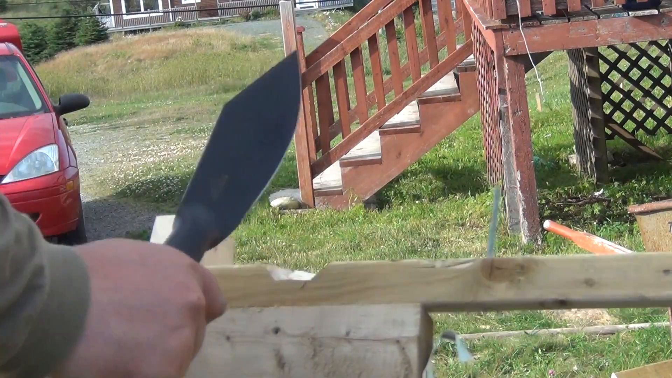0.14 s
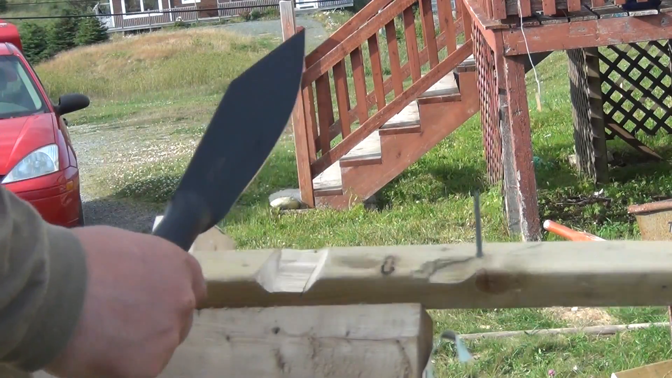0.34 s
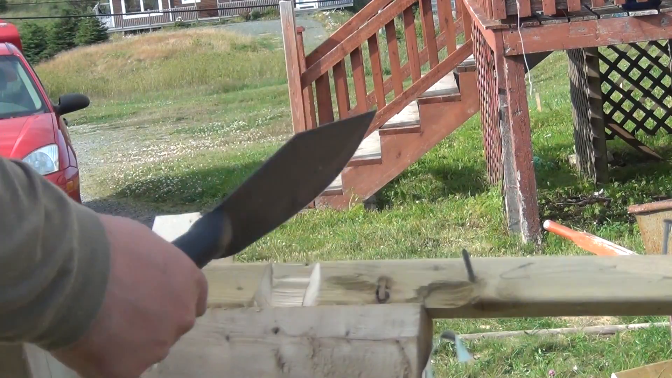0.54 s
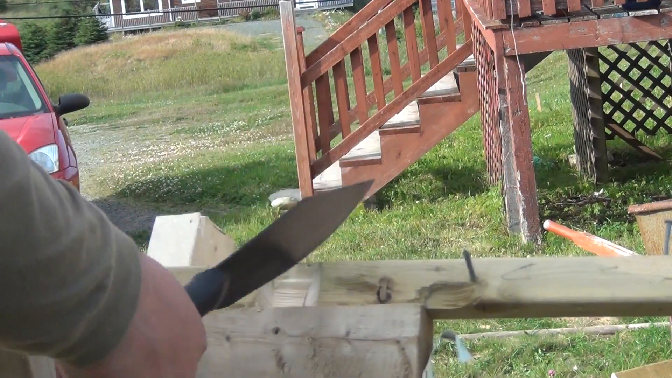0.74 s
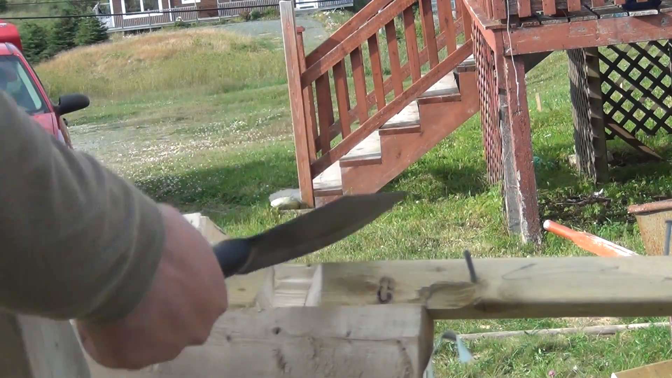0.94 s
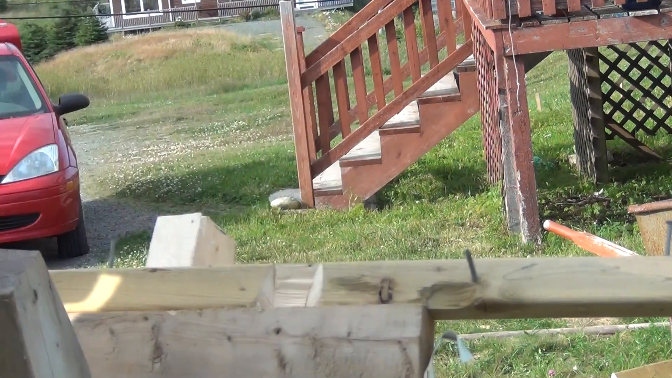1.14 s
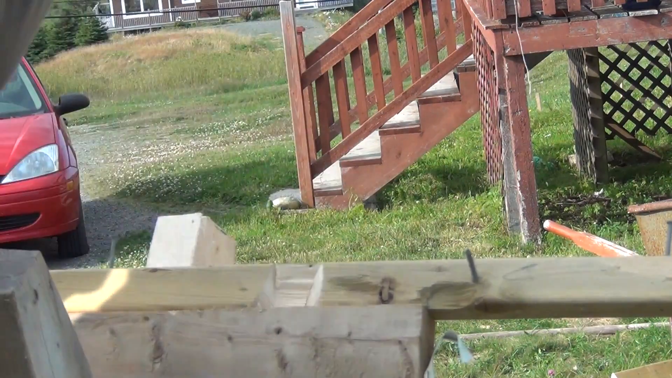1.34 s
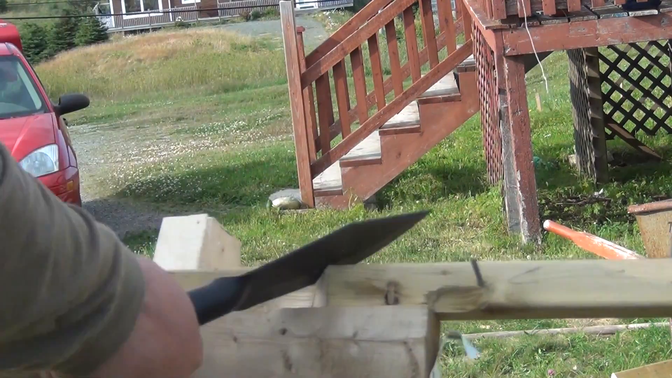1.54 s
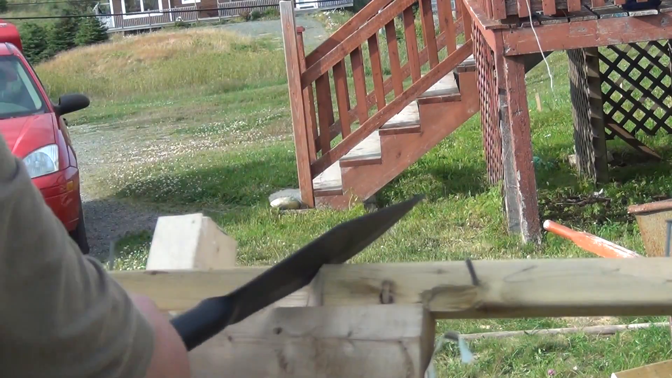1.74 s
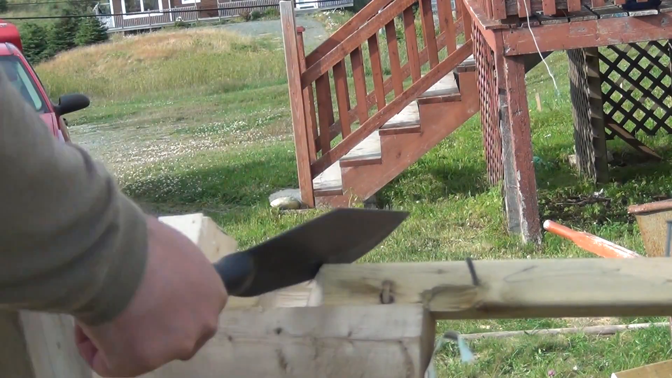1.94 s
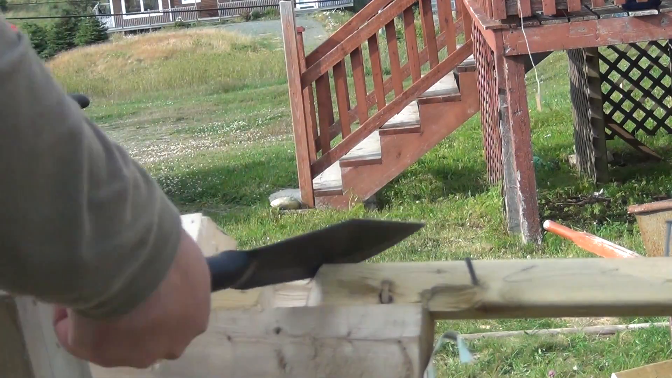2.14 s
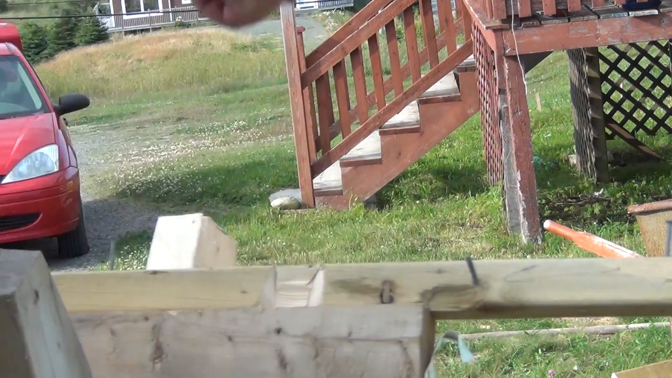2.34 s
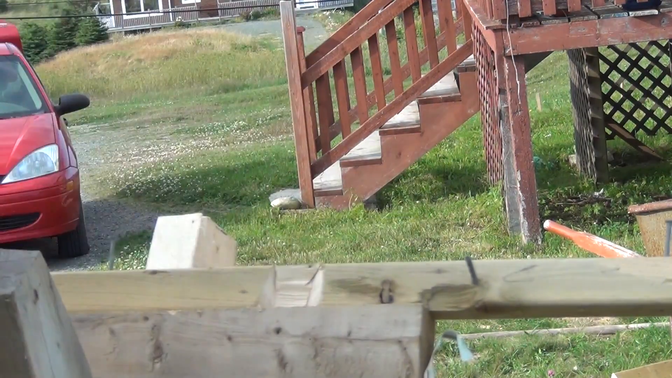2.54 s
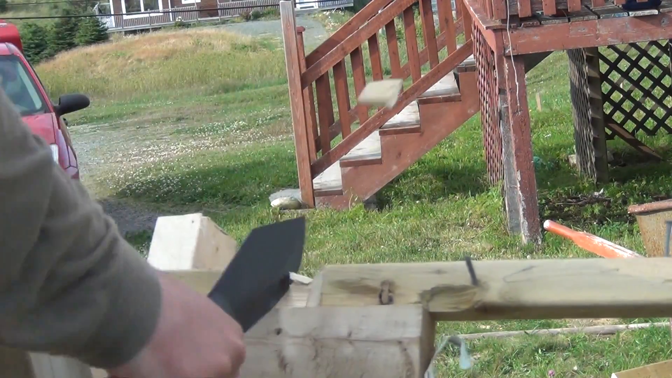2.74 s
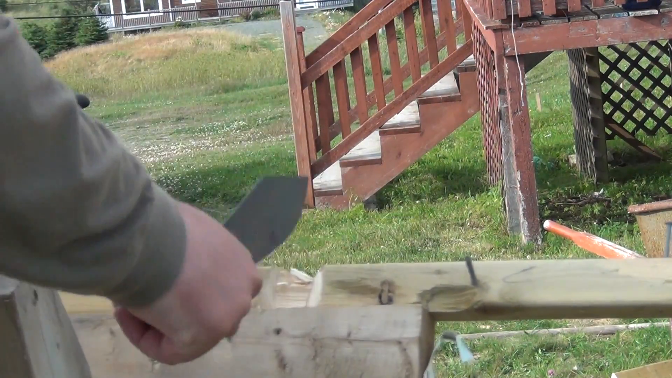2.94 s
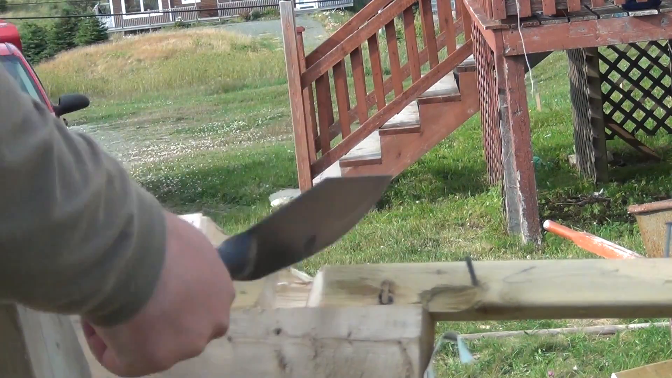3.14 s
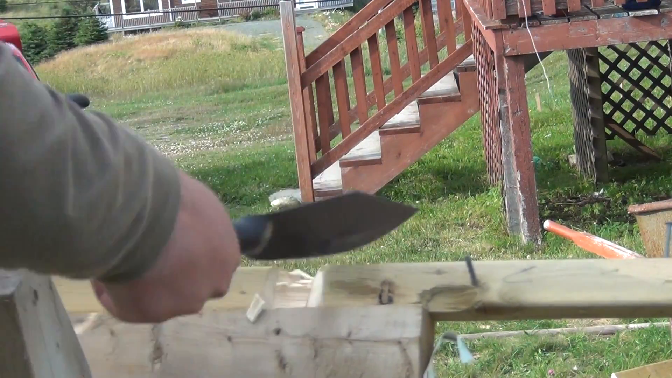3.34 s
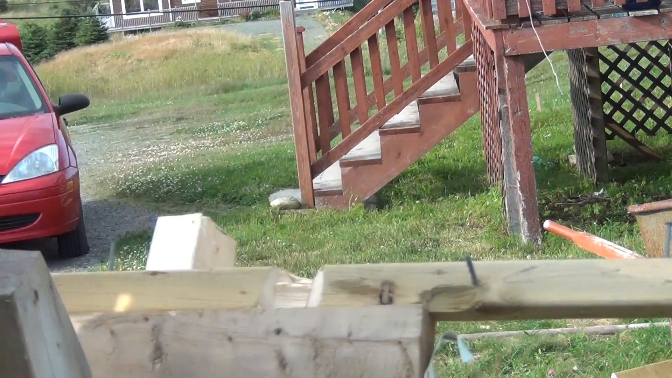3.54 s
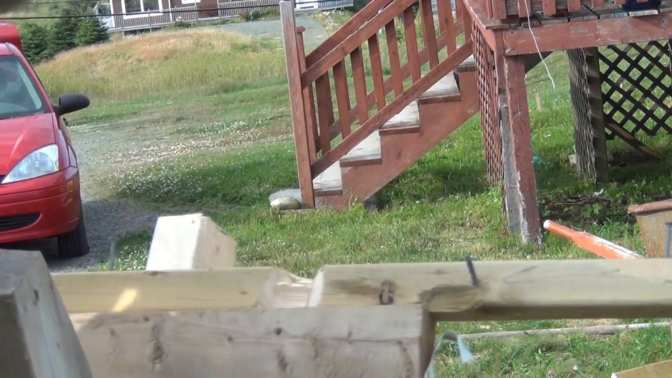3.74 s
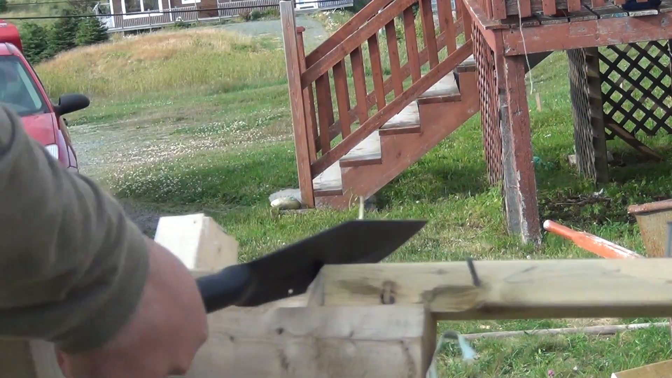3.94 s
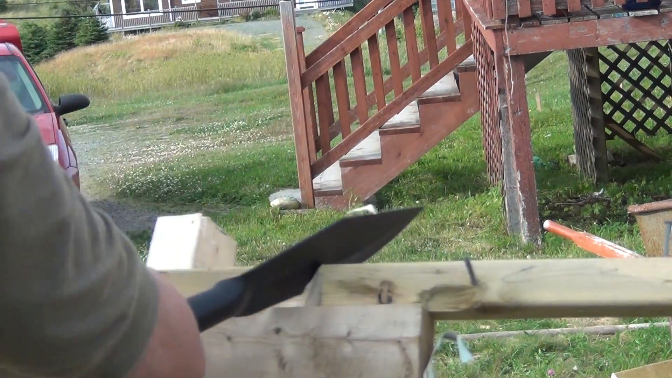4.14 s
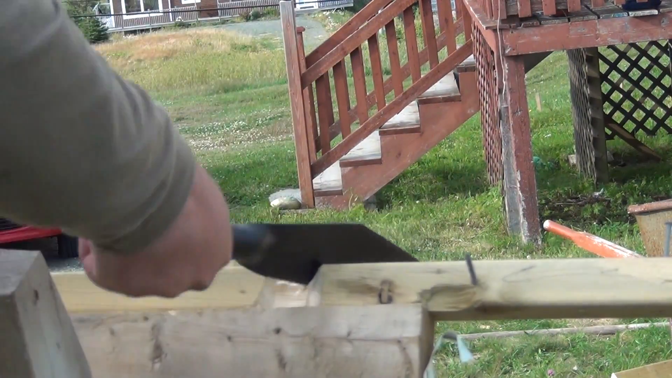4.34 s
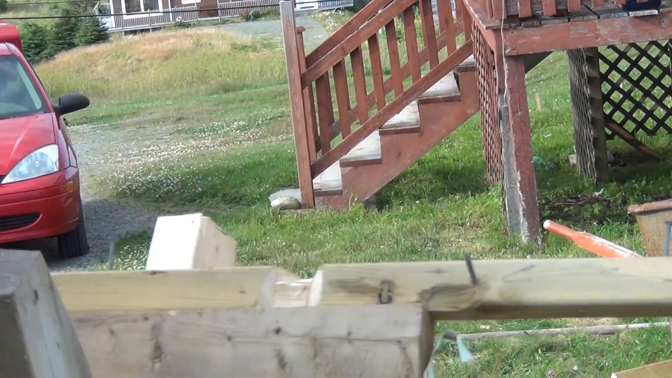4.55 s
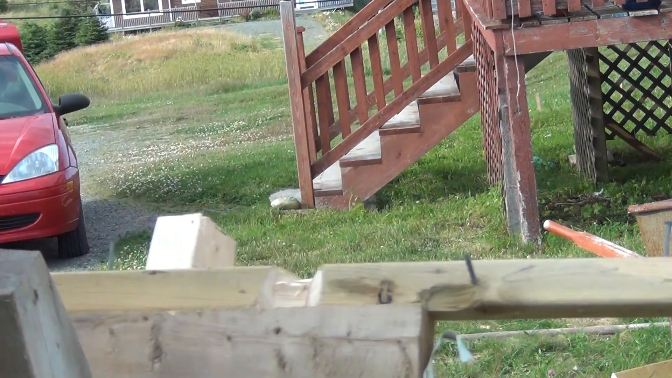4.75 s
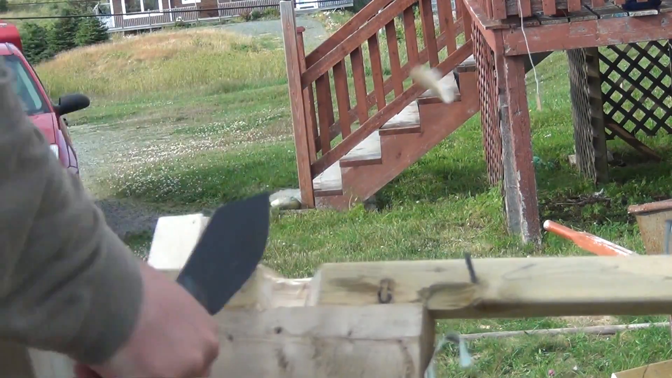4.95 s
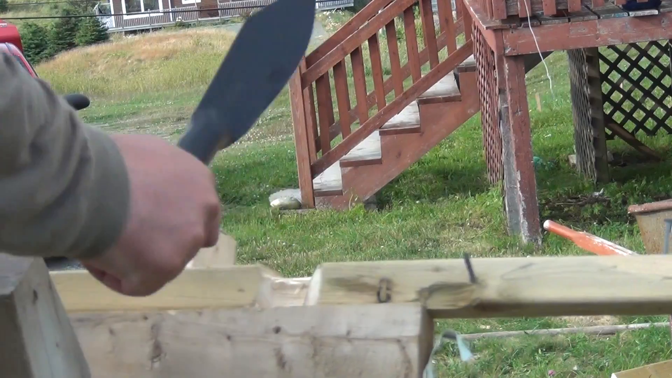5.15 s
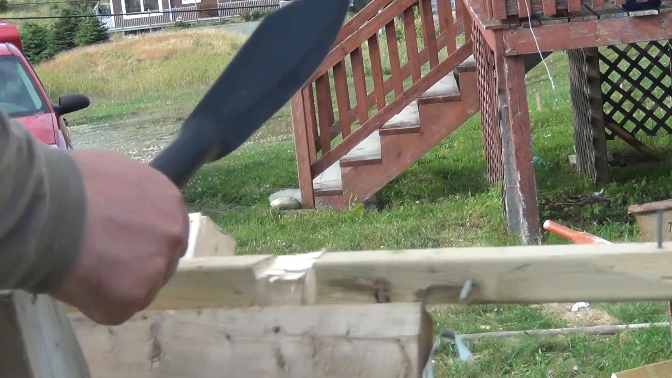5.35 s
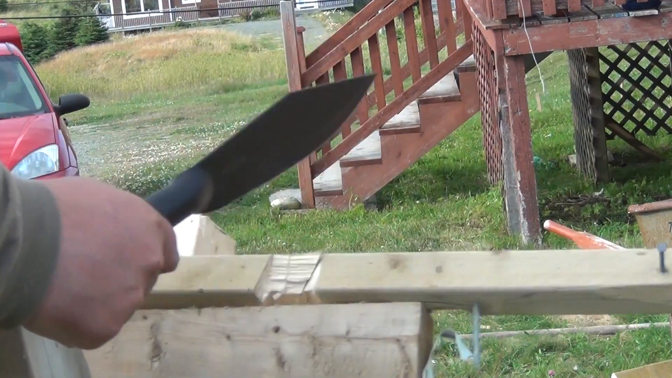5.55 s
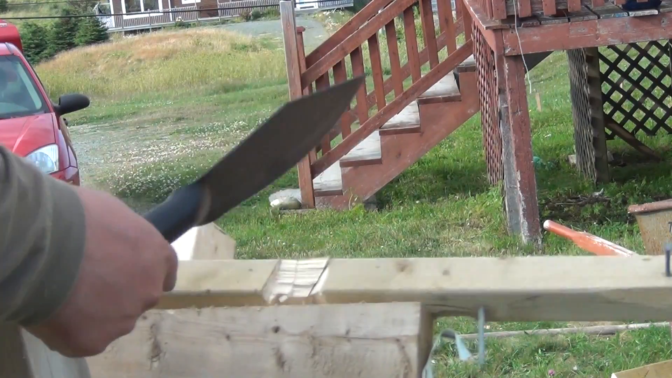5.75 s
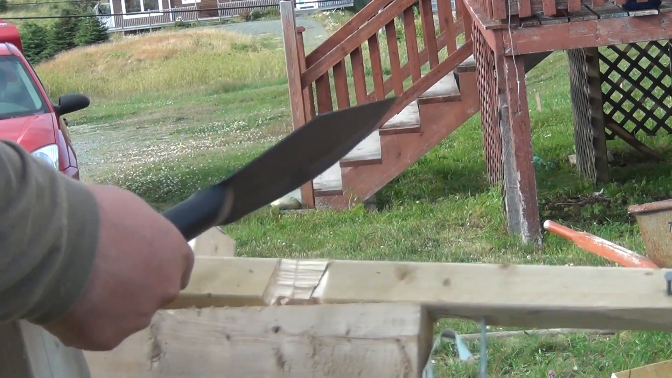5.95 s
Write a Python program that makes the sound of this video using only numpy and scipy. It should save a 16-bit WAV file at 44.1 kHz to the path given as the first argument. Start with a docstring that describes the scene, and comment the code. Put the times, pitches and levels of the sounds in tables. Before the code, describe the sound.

A large knife cuts a notch in a beam in an open yard. Quiet handling taps and a modest knock come first, then four loud, dry chops with woody thuds, bounces, splintering and metallic ring. Small scrapes and clicks follow as the edge is levered out. Wind rumbles in lumps against the close microphone, with a soft far road hum and short dull echoes. It ends on light rubs.

```python
"""Chopping a notch outdoors

A heavy knife chops into a loose beam on a timber stand: cracks and thuds are short noise, the booming,
bouncing beam and the ringing steel are sums of fading tones. Between chops the blade is levered out,
with tears, scrapes and ticks of shaped noise. Wind buffets the microphone over a far road hum, with a
faint whine and dull echoes; the recorder's limiter flattens the chops."""
import sys
import numpy as np
from scipy import signal
from scipy.fft import rfft, irfft, next_fast_len
from scipy.io import wavfile

SR = 44100
rng = np.random.default_rng(int(sys.argv[2]) if len(sys.argv) > 2 else 0)


def put_to_file(sound):
    """Save the sound as 16-bit audio at rate SR, in the file named by the first command-line argument."""
    columns = np.atleast_2d(sound).T  # one column per channel
    safe = np.clip(columns, -1, 1)
    whole_steps = np.round(safe * 32767)
    wavfile.write(sys.argv[1], SR, whole_steps.astype(np.int16))


N = 265041


def amp(db):
    """Turns dB into a gain."""
    return 10 ** (np.asarray(db) / 20)


def unit(x):
    """Scales a sound to an rms of 1."""
    return x / np.sqrt(np.mean(x ** 2) + 1e-20)


def in_time(rows, outside=None):
    """Reads the columns of a time curve at every sample."""
    s, *columns = np.transpose(rows)
    return [np.interp(np.arange(N) / SR, s, c, left=outside, right=outside) for c in columns]


def at_hz(points, hz):
    """Reads a curve over pitch, with straight lines on a log-frequency axis."""
    point_hz, values = np.array(points).T
    return np.interp(np.log(hz), np.log(point_hz), values)


def band(x, low_hz, high_hz):
    """Keeps mainly the sound between two frequencies."""
    edges = [low_hz, min(high_hz, .48 * SR)]
    return signal.sosfilt(signal.butter(2, edges, "band", fs=SR, output="sos"), x)


def drift(rate_hz):
    """A smooth random wander around zero with a spread of 1, made at one point per 40 samples."""
    r = np.exp(-80 * np.pi * rate_hz / SR)
    slow = signal.lfilter([1], [1, -2 * r, r * r], rng.standard_normal(N // 40 + 2002))[2000:]
    return np.interp(np.arange(N) / 40, np.arange(len(slow)), unit(slow))


def fading(s, t60, rise):
    """Start sample, time axis and envelope of a sound that rises and falls 60 dB over t60 seconds."""
    start = round(s * SR)
    t = np.arange(min(round(t60 * SR), N - start)) / SR
    return start, t, amp(-60 * t / t60) * (1 - np.exp(-t / rise))


def add(out, start, x):
    """Mixes x into out from a given sample."""
    out[..., start:start + x.shape[-1]] += x


def coloured(spectrum, likeness):
    """Stereo noise of rms 1 with a given spectrum and left-right likeness."""
    size = next_fast_len(N)
    hz = np.maximum(np.arange(size // 2 + 1) * SR / size, 1)
    mid, side = rfft(rng.standard_normal((2, size))) * amp(at_hz(spectrum, hz))
    alike = np.clip(at_hz(likeness, hz), 0, 1)
    both = np.sqrt(1 + alike) * mid + np.sqrt(1 - alike) * side * [[1], [-1]]
    return unit(irfft(both, size)[:, :N])


def knocks():
    """Each contact gives a bright crack, a dull thud that dies band by band, and the beam's modes."""
    # Chops, bounces and chips. Each row: start in seconds, relative crack level in dB, relative beam
    # level in dB, share of the free ring time, hardness (tilt of thud and beam) in dB per octave.
    contacts = [(0.0416, -19, -61.5, 1, -7.5), (0.171, -34, -39, 0.44, -2), (0.3427, -29, -39.5, 0.68, 5.5),
                (0.5057, -14, -20.5, 0.87, 0), (0.5204, -19, -27.5, 1.34, -4),
                (0.7993, -11, -34, 0.83, -5.5), (1.5429, 7, -5.5, 0.36, 0.3),
                (1.5553, -25, -5.5, 0.65, -1.5), (1.581, -5.5, -19, 1.2, 0.5), (1.6246, -7, -20, 0.62, 2),
                (1.6558, -17, -16, 0.21, 3.5), (1.7125, -19.5, -54, 0.56, 7),
                (2.0527, -4, -30.5, 0.28, 5.5), (2.3566, -8, -35.5, 0.86, -3), (2.8036, 2.5, -7.5, 1.1, 5),
                (2.8256, 1, -14, 1, -2), (2.8639, -6.5, -20, 1.04, 6), (2.8805, 1.5, -22.5, 0.69, 2),
                (2.9044, -8, -40, 0.66, 16.5), (2.9416, -17, -37.5, 1.34, 5.5),
                (3.2975, -29, -21.5, 0.24, -1), (3.3157, -9, -30.5, 0.52, -3), (3.325, -16, -43, 0.3, 3),
                (3.336, -9.5, -52, 0.54, -8), (3.9497, 5.5, -4.5, 0.78, 5), (3.97, -8, -1.5, 0.3, -0.5),
                (3.982, -7, -17, 0.61, -6), (4.0056, -6, -22.5, 1.3, -0.5), (4.0294, -8, -20.5, 0.94, 5),
                (4.059, 0, -14, 0.21, 0), (4.0826, -25, -33, 1, 5.5), (4.181, -16, -34.5, 0.58, 9.5),
                (4.5172, -6.5, -37, 0.29, 5), (5.0156, 1, -8, 1.15, 6.5), (5.034, -7, -8.5, 0.73, 1.5),
                (5.0482, 1, -7, 0.42, 6), (5.0751, -15, -29.5, 0.3, -12), (5.094, -1, -30.5, 1.03, -2.5),
                (5.1035, -25, -29, 0.46, 14), (5.115, -5, -31.5, 0.32, 14), (5.146, -34, -41, 0.26, 16.5),
                (5.475, -23, -42, 0.56, 7), (5.5957, -32, -33.5, 1.1, 5.5), (5.6216, -38, -24, 0.81, -3.5),
                (5.6407, -21, -28, 1.23, -1), (5.8086, -46, -40.5, 1, -6.5)]
    # Beam modes, then noise bands of crack and thud.
    # Each row: frequency in Hz, relative level in dB, free time to fall 60 dB in seconds.
    beam_modes = [(202.8, -6, 0.31), (332, -0.5, 0.29), (455.3, -6.5, 0.36), (630.5, 0.5, 0.25),
                  (701, -3.5, 0.33), (807, 2, 0.19), (964, -3, 0.26), (1067, 5, 0.2), (1177, 6, 0.14),
                  (1630, 0.5, 0.094), (1613, 4, 0.15), (2410, 2, 0.11)]
    crack_bands = [(2450, -5, 0.041), (4550, -9.5, 0.12), (5840, -7.5, 0.12), (9760, 1.5, 0.035)]
    thud_bands = [(177, -22.5, 0.39), (312, -5, 0.29), (453, -2.5, 0.18), (702, -4, 0.13),
                  (1152, -2.5, 0.14), (1840, -11, 0.071), (3280, -11, 0.06)]
    splinter_db, splinters_hz = 3, 58   # each band of a crack or thud comes in lumps
    soft_rise_s, rise_db_per_db = 0.00013, 0.2   # lighter contacts crush fibres and open more slowly

    out = np.zeros(N)
    noise = {}
    for hz, db, t60 in crack_bands + thud_bands:
        lumps = amp(splinter_db * drift(splinters_hz)[:SR])
        noise[hz] = unit(lumps * band(rng.standard_normal(SR), hz / 1.27, hz * 1.27))
    snap = unit(band(band(rng.standard_normal(SR), 3200, 14000), 1600, 12400))
    strength_db = rng.normal(0, 1.14, (len(contacts), len(beam_modes)))
    phase = rng.uniform(0, 2 * np.pi, strength_db.shape)
    detune = 1 + rng.normal(0, .012, strength_db.shape)   # the loose beam never rests the same way twice
    fresh = rng.integers(SR // 20, SR // 2, len(contacts))   # where each contact reads its noise

    for k, (s, crack_db, beam_db, damping, hardness_db) in enumerate(contacts):
        opening = min(soft_rise_s * amp(-rise_db_per_db * crack_db), .0006)
        start, t, envelope = fading(s, 0.00024 + 3.9 * opening, rise=0.26 * opening)   # the first snap
        add(out, start, amp(crack_db - 5.5) * envelope * snap[fresh[k]:fresh[k] + len(t)])
        damping = np.clip(damping, .1, 1.6)
        # thud and beam start quickly in light contacts and swell in more slowly in heavy ones
        swell_in = np.clip(amp(.6 * (beam_db + 10)), .3, 1)

        for hz, db, t60 in crack_bands:
            start, t, envelope = fading(s, min(t60 * damping, .3), rise=opening)
            gain = amp(crack_db + db - 22.5)
            add(out, start, gain * envelope * noise[hz][fresh[k]:fresh[k] + len(t)])
        for hz, db, t60 in thud_bands:   # the lower the band, the slower its start
            start, t, envelope = fading(s, min(t60 * damping, .3), rise=4.55 * swell_in / hz)
            gain = amp(beam_db + db - 4.5 + hardness_db * np.log2(hz / 1000))
            add(out, start, gain * envelope * noise[hz][fresh[k]:fresh[k] + len(t)])
        for j, (hz, db, t60) in enumerate(beam_modes):
            start, t, envelope = fading(s, t60 * damping, rise=3.6 * swell_in / hz)
            gain = amp(beam_db + db - 15.0 + hardness_db * np.log2(hz / 1000) + strength_db[k, j])
            tone = np.sin(2 * np.pi * hz * detune[k, j] * t + phase[k, j])
            add(out, start, gain * envelope * tone)
    return out


def blade():
    """Steel modes whose balance depends on where it is struck; in wood they swell as it comes free."""
    # Blows that ring the blade. Each row: start in seconds, relative ring level in dB, brightness (rise
    # from 3.8 to 9.5 kHz) in dB, two favoured modes in Hz and Hz, share of the free ring time
    # (held to 0.15-1.5), swell time in ms (at least 0.2).
    blows = [(.0414, -54.5, 11.5, 8952, 8450, 1.23, 0.56), (.8, -50.5, 27, 7273, 9030, 0.91, 0.27),
             (1.029, -65, 11, 8952, 10310, 0.59, 2), (1.542, -33, 35, 9400, 10430, 0.12, 0.46),
             (2.0527, -43, 38, 8952, 10310, 0.17, 0.21), (2.3584, -44, 12.5, 3085, 10310, 0.76, 3.7),
             (2.804, -29.5, 12, 8450, 9740, 0.75, 2.6), (2.815, -30, 8, 3205, 5640, 0.57, 10),
             (2.82, -40, -4, 3480, 3480, 0.81, 2), (3.0275, -56.5, 1, 8450, 10310, 0.51, 3.4),
             (3.2985, -44, 4.5, 10310, 8380, 0.82, 2), (3.3155, -46.5, 24, 8952, 8825, 0.48, 0.61),
             (3.3834, -56.5, 11, 6078, 8825, 0.46, .7), (3.433, -57, 19, 10310, 8780, 1, 2.7),
             (4.038, -41, -1, 8450, 8900, 0.19, .7), (4.519, -42, 19, 8450, 12300, 0.66, 2.6),
             (5.017, -26.5, 12, 5640, 4380, 0.44, 5.2), (5.02, -23, 22, 8952, 8825, 0.63, 34),
             (5.03, -53.5, -20.5, 3205, 3205, 1.1, 11), (5.05, -36, 3, 6078, 4380, 1, 4.2)]
    # Blade modes. Each row: frequency in Hz, relative level in dB, free time to fall 60 dB in seconds.
    blade_modes = [(2150, 0, 0.28), (3085, -2, 0.5), (3205, 1.5, 0.57), (3450, -2, 0.17), (4380, 0.5, 0.4),
                   (5640, -5.5, 0.29), (6078, -4.5, 0.34), (7160, -1, 0.1), (7150, -7.5, 0.31),
                   (8450, -2.5, 0.19), (8860, 0.5, 0.13), (8952, -10.5, 0.24), (9210, 6.5, 0.073),
                   (10330, 3, 0.082), (12300, -7, 0.12)]
    # Wood or hand touches the ringing blade. Each row: time in seconds, loss of the upper modes in dB,
    # loss of the lower modes in dB (a negative loss is a gain).
    touches = [(2.866, 15, -3), (2.966, 6, 11), (5.092, 13, -2), (5.135, 1, 5), (5.2, 5, 6)]
    upper_hz = 3300   # upper modes lie above this
    # Favoured modes that start flat after a hard blow and glide up.
    # Each row: frequency in Hz, starting flatness as a share of the pitch.
    bends = [(3480, .085), (6078, .035)]
    bend_s, bend_above_db = .012, -50   # glide time, and the ring level a blow must exceed

    out = np.zeros(N)
    strength_db = rng.normal(0, 2, (len(blows), len(blade_modes)))
    waver = 1 + .002 * drift(40)   # the grip bends the pitch a little
    for k, (s, ring_db, bright_db, first_hz, second_hz, free, swell_ms) in enumerate(blows):
        tilt = [(3800, ring_db - bright_db / 2), (9500, ring_db + bright_db / 2)]
        for j, (hz, db, t60) in enumerate(blade_modes):
            distance = np.log(hz / np.array([first_hz, second_hz]))
            near = np.exp(-(distance / .012) ** 2).sum()   # large for a favoured mode, else about 0
            start, t, envelope = fading(s, t60 * np.clip(free, .15, 1.5), rise=max(swell_ms, .2) / 1000)
            for touch_s, upper_db, lower_db in touches:
                if touch_s > s:
                    loss_db = upper_db if hz > upper_hz else lower_db
                    envelope = envelope * amp(-loss_db * np.clip((s + t - touch_s) / 0.014, 0, 1))
            bend = sum(share for bend_hz, share in bends if abs(np.log(hz / bend_hz)) < .02)
            flat = bend * (ring_db > bend_above_db and near > .5) * np.exp(-(t / bend_s) ** 2)
            gain = amp(db + at_hz(tilt, hz) + 10.4 * near + strength_db[k, j])
            angle = 2 * np.pi * hz / SR * np.cumsum(waver[start:start + len(t)] - flat)
            add(out, start, gain * envelope * np.sin(angle))
    return out


def strokes():
    """Loudness curves of tears and of scrapes, as rows of (seconds, grit dB, dull dB)."""
    # When fibres start tearing after each chop, in seconds.
    tear_starts = [1.553, 2.8036, 3.9497, 5.0156]
    # The tears. Each row: length in seconds, bright grit level in dB, dull rub level in dB,
    # opening burst above the dull level in dB.
    tear_rows = [(0.074, -42, -39, 21), (0.087, -40.5, -27.5, 10), (0.11, -42, -30.5, 16),
                 (0.078, -40.5, -27.5, 13.5)]
    # Blade or beam dragged over wood. Each row: start in seconds, length in seconds,
    # bright grit level in dB, dull rub level in dB, both before the pressure is added.
    scrape_rows = [(0.424, 0.19, -53.5, -51), (0.597, 0.059, -54, -56), (1.966, 0.15, -52, -62),
                   (2.311, 0.086, -50.5, -57), (3.296, 0.044, -37, -64), (3.587, 0.029, -50.5, -68),
                   (4.416, 0.13, -55, -68), (4.505, 0.054, -41, -49), (5.473, 0.11, -58, -59),
                   (5.551, 0.096, -46, -48), (5.632, 0.15, -62, -57.5), (5.749, 0.087, -56, -54),
                   (5.828, 0.11, -56, -51), (5.96, 0.08, -69, -56)]
    # Pressure along a scrape. Each row: share of its length, added level in dB.
    pressure = [(0, -11), (.25, 1.5), (0.601, 3), (.75, -5.5), (0.999, -14)]
    burst_s, grit_burst_share = 0.051, 0.46   # the burst dies down to the level, which holds to the end
    let_go_s, let_go_db = 0.04, 12   # then the wood lets go
    tail_s, grit_tail_db, dull_tail_db = 0.21, 34, 22   # and a few fibres trail on

    tears = []
    for s, (length, grit_db, dull_db, burst_db) in zip(tear_starts, tear_rows):
        end = s + length
        loose = end + let_go_s
        loose_grit_db, loose_dull_db = grit_db - let_go_db, dull_db - let_go_db
        tears.append([(s, grit_db + grit_burst_share * burst_db, dull_db + burst_db),
                      (s + burst_s, grit_db, dull_db),
                      (end, grit_db, dull_db),
                      (loose, loose_grit_db, loose_dull_db),
                      (loose + tail_s, loose_grit_db - grit_tail_db, loose_dull_db - dull_tail_db)])
    scrapes = [[(s + share * length, grit_db + db, dull_db + db) for share, db in pressure]
               for s, length, grit_db, dull_db in scrape_rows]
    return tears, scrapes


def rubbing():
    """Dense uneven clicks of fibres catching on an edge, heard bright and dull."""
    # Colour of the bright grit. Each row: frequency in Hz, relative level in dB.
    grit_colour = [(4000, 0), (6000, 5), (9000, 12), (11500, 14), (16000, -30)]

    sizes = amp(2.5 * np.minimum(rng.exponential(1, N), 5)) * rng.choice([-1, 1], N)
    catches = rng.random(N) < 900 * amp(7 * drift(60)) / SR   # typically 900 a second, in flurries
    clicks = sizes * catches + 0.23 * rng.standard_normal(N)
    colour_hz, colour_db = np.array(grit_colour).T
    colour = signal.firwin2(65, [0, *colour_hz, SR / 2], [0, *amp(colour_db), 0], fs=SR)
    grit = unit(signal.lfilter(colour, 1, clicks))
    split = unit(band(band(clicks, 720, 2780), 750, 4200))
    drag = unit(band(clicks, 750, 3760))

    out = np.zeros(N)
    tears, scrapes = strokes()
    # gains are smoothed over some samples: drags start more softly than tears
    for curves, dull, soft in (tears, split, 40), (scrapes, drag, 200):
        for curve in curves:
            gains = amp(in_time(curve, outside=-200))
            grit_gain, dull_gain = signal.lfilter(np.full(soft, 1 / soft), 1, gains)
            out += grit_gain * grit + dull_gain * dull
    return out


def ticks():
    """The edge skips over the grain: a thin bright click and narrow bands of noise for the steel."""
    # Skips as the blade is levered out. Each row: time in seconds, relative level in dB.
    skips = [(0.621, -45), (0.755, -40), (1.968, -35), (1.9905, -37), (2.015, -44), (2.022, -40),
             (2.0335, -38), (2.0745, -43), (2.092, -37), (2.102, -34.5), (2.117, -44), (3.3255, -26),
             (3.3376, -31), (3.349, -40), (4.194, -52), (4.205, -46), (5.074, -26), (5.104, -29),
             (5.478, -40), (5.598, -30)]

    out = np.zeros(N)
    click = unit(band(rng.standard_normal(N), 6600, 12400))
    steel = unit(unit(band(click, 9200, 9300)) + unit(band(click, 10000, 11100)))
    for s, db in skips:
        for sound, t60, share_db in (click, .012, 0), (steel, .05, -8):
            start, t, envelope = fading(s, t60, rise=.0002)
            add(out, start, amp(db + share_db) * envelope * sound[start:start + len(t)])
    return out


def swells():
    """A faint pure tone that comes and goes in rounded arches."""
    # A thin tone while the knife is in the air.
    # Each row: start in seconds, length in seconds, peak level in dB.
    arches = [(0.103, 0.25, -67.5), (2.444, 0.26, -61), (4.742, .11, -62.5)]
    tone_hz = 5780

    out = np.zeros(N)
    for s, length, db in arches:
        t = np.arange(round(length * SR)) / SR
        arch = np.sqrt(np.sin(np.pi * t / length))
        add(out, round(s * SR), amp(db) * arch * np.sin(2 * np.pi * tone_hz * t))
    return out


def yard(x):
    """Scattered dull echoes from walls, steps and ground, as fading noise unlike on each side."""
    level_db, t60_s = -15.5, 0.13
    t = np.arange(round(.5 * SR)) / SR
    white = rng.standard_normal((2, len(t)))
    dull_white = band(white, 94, 13600) + 1.12 * band(white, 122, 600)
    scatter = dull_white * amp(-60 * t / t60_s) * (1 - np.exp(-t / 0.00038))
    scatter = scatter / np.sqrt(np.sum(scatter ** 2) / 2)   # mean energy of 1 per side
    return amp(level_db) * signal.fftconvolve(x[None], scatter, axes=1)[:, :N]


def wind():
    """Lumpy low noise, and eddies that push the diaphragm for a few cycles."""
    # Buffeting. Each row: time in seconds, relative level in dB.
    buffeting = [(1.38, -70), (1.52, -45), (1.84, -47), (1.92, -19), (2.0, -39), (2.33, -36), (2.63, -33),
                 (2.67, -64), (2.76, -44), (3.0, -68), (3.07, -47.5), (3.13, -77), (3.24, -82),
                 (3.29, -40.5), (3.46, -51), (3.7, -42), (3.85, -31.5), (4.05, -42.5), (4.49, -57.5),
                 (4.58, -24), (4.68, -33), (4.9, -50.5), (5.18, -38), (5.26, -33.5), (5.3, -41),
                 (5.38, -20.5), (5.5, -38), (5.68, -42), (5.9, -59), (5.99, -39.5)]
    # Single gust thumps on the microphone ports.
    # Each row: start in seconds, relative level in dB, frequency in Hz.
    thumps = [(1.783, -20.5, 128), (1.912, -3.5, 238), (1.963, -11, 217), (2.21, -14, 174),
              (2.112, -26, 203), (2.346, -13, 230), (2.381, -5.5, 135), (2.558, -13, 222),
              (2.591, -11.5, 125), (3.681, -16.5, 167), (3.785, -15.5, 204), (3.814, -13, 129),
              (3.889, -13, 179), (3.922, -14, 168), (4.561, -6.5, 163.5), (4.57, -16, 123),
              (4.663, -10.5, 185), (4.706, -10.5, 185), (5.254, -9, 245), (5.57, -18, 151),
              (5.702, -17.5, 173), (5.33, -8, 187), (5.346, -5.5, 181), (5.384, -16, 240),
              (5.451, -10, 161)]
    # Colour of the gusts. Each row: frequency in Hz, relative level in dB.
    gust_colour = [(20, -41), (65, 4.5), (110, 3.5), (190, 2), (330, -5.5), (560, -19.5), (900, -22.5),
                   (1500, -55)]
    # Each row: frequency in Hz, left-right likeness from 0 to 1.
    gust_likeness = [(30, 1), (300, 0.53)]
    lump_top = 0.89   # cap on the main lumps, in spreads above the mean
    thump_edge = 0.27   # share of the octave that steepens a thump

    side_lumps = np.array([drift(55.0), drift(60)])   # a little different on each side
    lumps = amp(5.15 * np.minimum(drift(30.7), lump_top) + 0.23 * side_lumps)
    level = amp(in_time(buffeting, outside=-94)[0] + 0.5)
    out = level * unit(lumps * coloured(gust_colour, gust_likeness))
    lean_db = rng.normal(0, 4.5, len(thumps))   # each eddy hits one port harder
    for (s, db, hz), lean in zip(thumps, lean_db):
        start, t, envelope = fading(s, 5.7 / hz, rise=1.0 / hz)
        gain = amp(db + 3.0 + lean * np.array([[.5], [-.5]]))
        angle = 2 * np.pi * hz * t
        add(out, start, gain * envelope * (np.sin(angle) + thump_edge * np.sin(2 * angle)))
    return out


def far_road():
    """Far traffic as a steady coloured noise whose level wanders slightly."""
    # Each row: time in seconds, relative level in dB.
    traffic = [(0.0, -54), (2.19, -51.5), (6.01, -52.5)]
    # Colour of the hum. Each row: frequency in Hz, relative level in dB.
    far_colour = [(25, -7), (60, -2.5), (110, -7.5), (200, -6), (400, -5.5), (630, -2), (1000, 3.5),
                  (1300, -1), (1600, -1.5), (2000, -10), (3200, -15), (6300, -19.5), (12000, -19.5),
                  (16500, -22.5)]
    # Each row: frequency in Hz, left-right likeness from 0 to 1.
    far_likeness = [(60, 1), (180, 0.89), (550, 0.89), (1650, 0.74), (4970, 0.6), (15000, 0.91)]
    level = amp(in_time(traffic)[0] + 3.0 + 0.038 * drift(21))
    return level * coloured(far_colour, far_likeness)


def whine():
    """A faint steady electronic tone, a plain sine near the top of hearing."""
    whine_hz, whine_db = 15735, -74
    return amp(whine_db) * np.sin(2 * np.pi * whine_hz * np.arange(N) / SR)


def scene():
    """Work near the middle, with echoes, wind and the far hum around it."""
    # the ring wavers as the blade turns and the grip shifts
    ringing = blade() * amp(2.0 * drift(89))
    work = knocks() + ringing + rubbing() + ticks() + swells()
    placed = work * amp([[.25], [-.25]])   # a touch louder on the left
    return placed + yard(work) + wind() + far_road() + whine()


def record(dry):
    """A limiter holds the peaks down and recovers fast, soft clipping rounds them; the top is cut."""
    threshold_db, recovery_db_s = -3.5, 253.5   # recovery is the fall of the held excess
    cutoff_hz = 16100   # 50 dB down from here up
    over = np.maximum(20 * np.log10(np.abs(dry).max(axis=0) + 1e-9) - threshold_db, 0)
    ramp = recovery_db_s * np.arange(N) / SR
    held = np.maximum.accumulate(over + ramp) - ramp
    ahead = np.append(held[40:], np.zeros(40))   # it looks about a millisecond ahead
    held = signal.lfilter([.03], [1, -.97], ahead)
    limited = np.tanh(dry * amp(-.7 * held))   # takes away 70 % of the smoothed excess dB
    return signal.sosfilt(signal.cheby2(24, 50, cutoff_hz, fs=SR, output="sos"), limited)


dry = scene()
out = record(dry)
put_to_file(out)
```